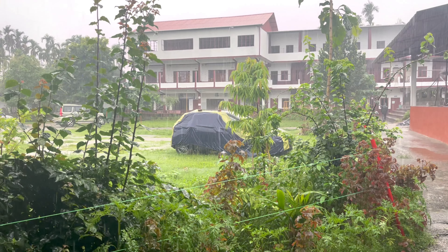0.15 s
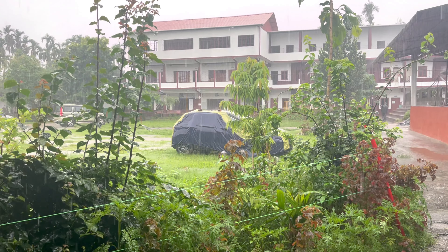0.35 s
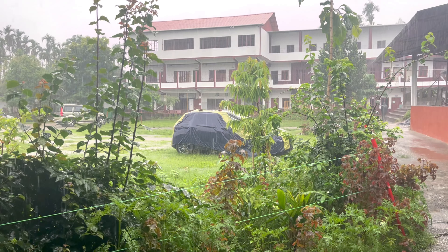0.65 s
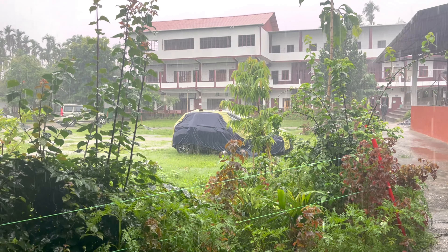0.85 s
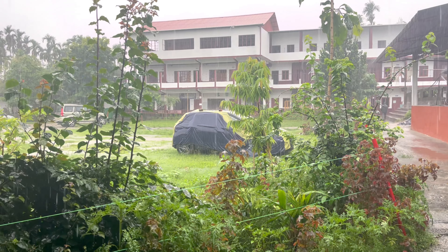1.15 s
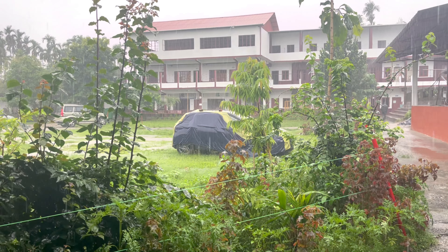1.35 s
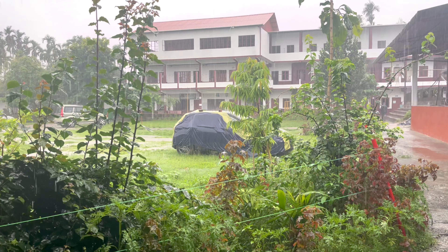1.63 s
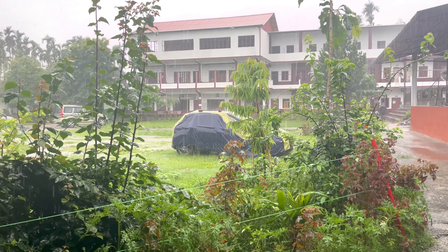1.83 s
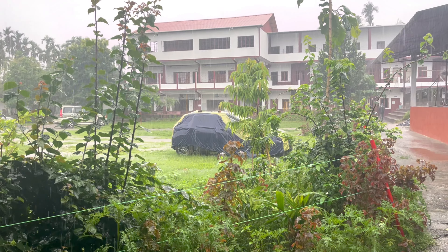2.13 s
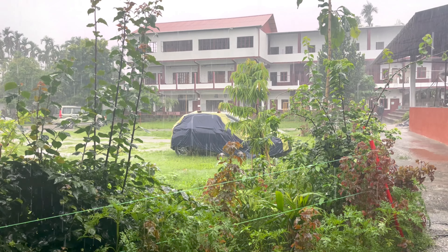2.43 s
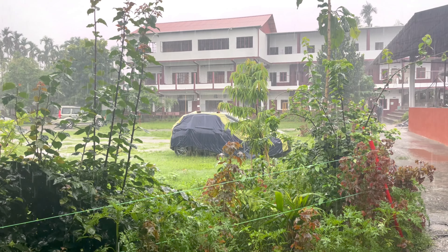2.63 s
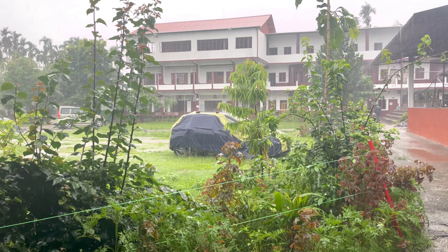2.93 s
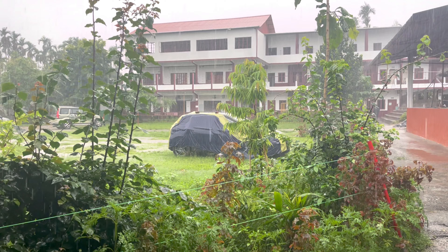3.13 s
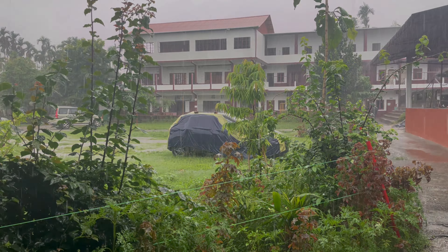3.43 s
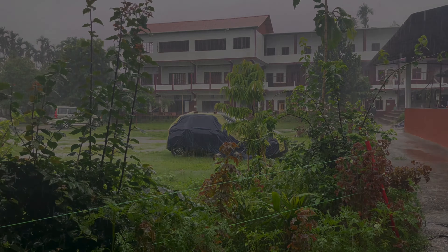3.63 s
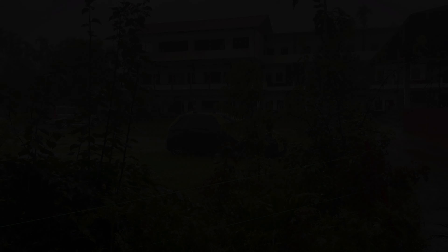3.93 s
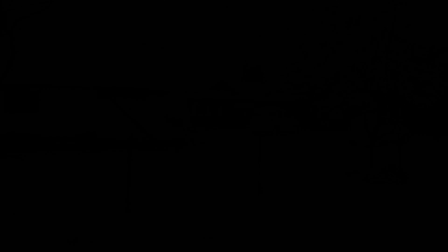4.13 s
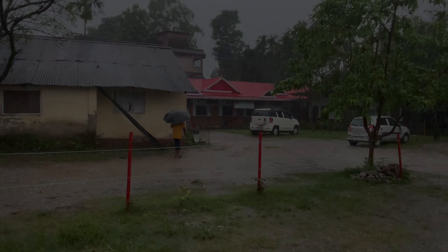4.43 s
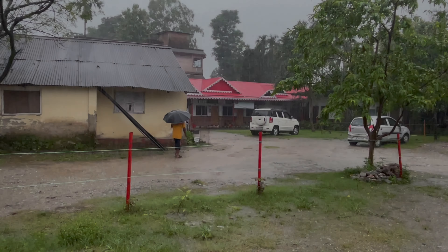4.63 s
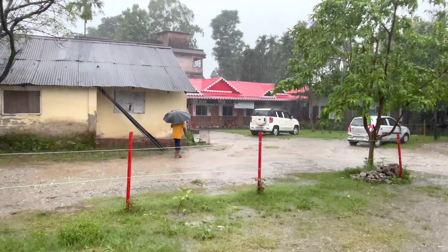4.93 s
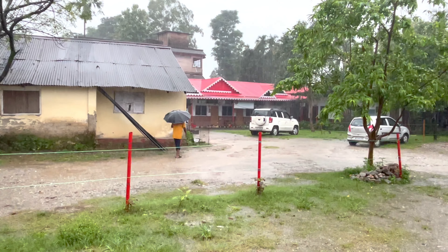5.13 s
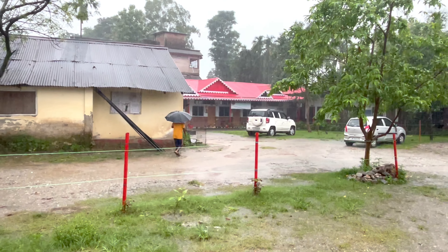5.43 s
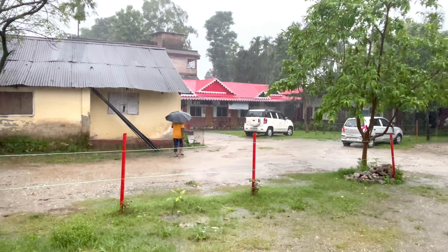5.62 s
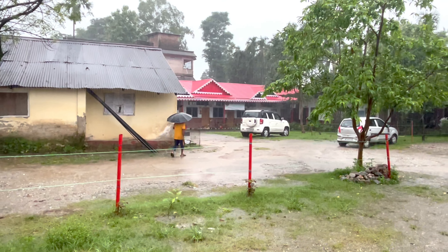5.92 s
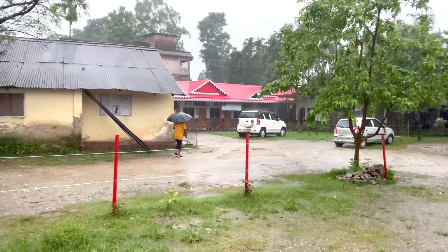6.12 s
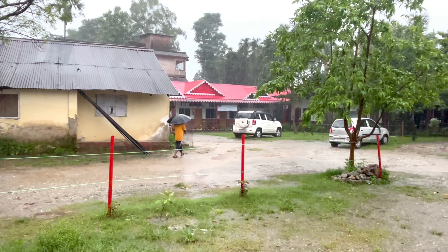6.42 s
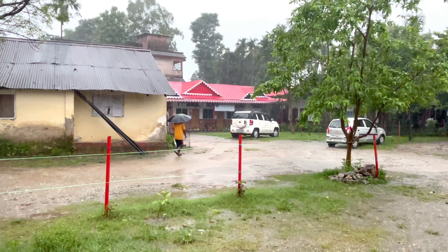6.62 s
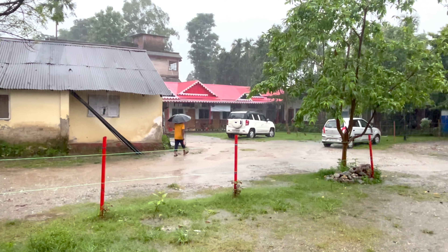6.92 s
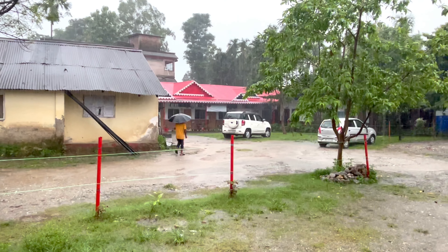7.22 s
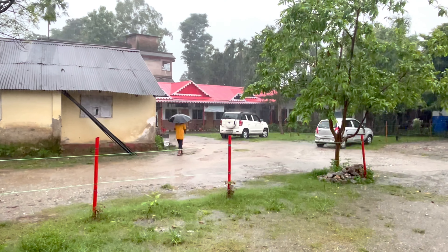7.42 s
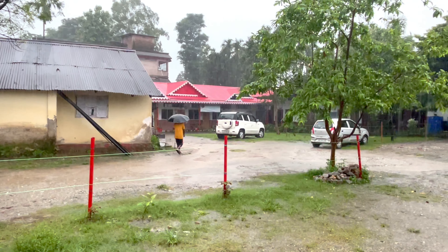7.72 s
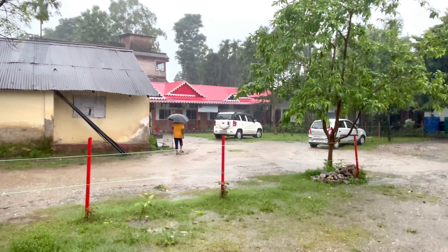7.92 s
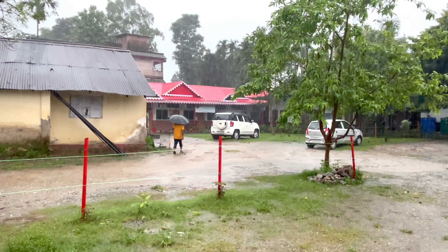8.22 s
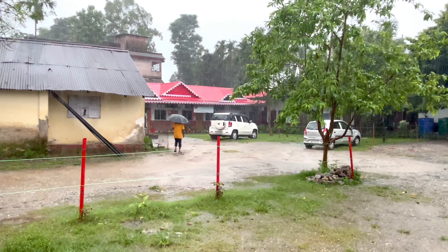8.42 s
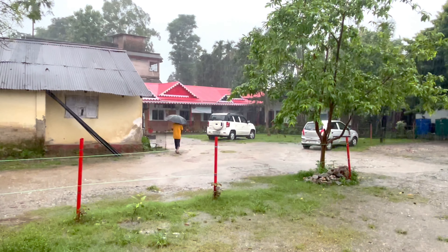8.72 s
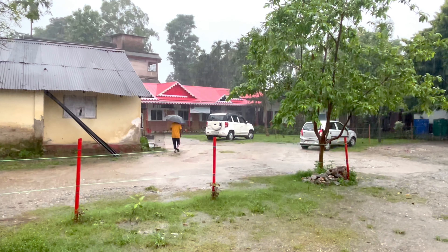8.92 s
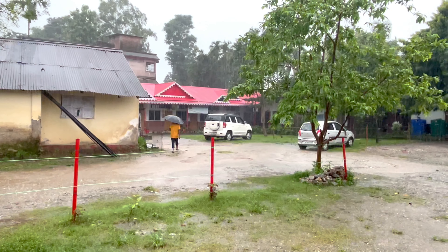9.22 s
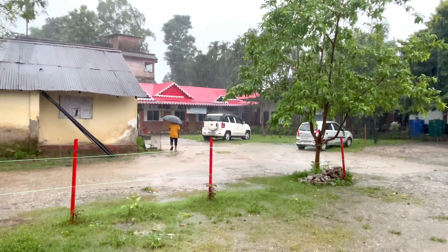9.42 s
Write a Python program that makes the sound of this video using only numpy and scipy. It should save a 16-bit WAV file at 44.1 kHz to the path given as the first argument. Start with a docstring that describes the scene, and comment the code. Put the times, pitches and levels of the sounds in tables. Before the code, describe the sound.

Steady downpour on foliage, low roar beneath, dwindles to silence; a hard cut brings darker yard rain with scattered drop knocks and soft booms.

```python
"""A leafy garden, then, after a hard cut, a gravel yard near a sheet roof: heavy rain in both,
heard by a small two-port microphone. The garden rain fades out before the cut.
Countless far drops blend into a wash of filtered noise, over a low roar and gusts of wind rumble.
Short dying oscillations make the sharp high ticks in both scenes, and the low-to-middle knocks
and short low booms in the yard."""
import sys
import numpy as np
from scipy import signal
from scipy.fft import rfft, irfft, next_fast_len
from scipy.io import wavfile
from scipy.ndimage import uniform_filter1d

SR = 44100
rng = np.random.default_rng(int(sys.argv[2]) if len(sys.argv) > 2 else 0)


def bounce(signal):
    """Save signal as a 16-bit WAV file at the path given by the first command-line argument."""
    frames = np.transpose(np.atleast_2d(signal))
    limited = np.clip(frames, -1, 1)
    pcm = np.round(limited * 32767).astype(np.int16)
    wavfile.write(sys.argv[1], SR, pcm)


N = 421584  # length in samples
CUT_S = 5.123  # the garden gives way to the yard
TICK_SPRAY_DB, KNOCK_SPRAY_DB = -31, -36  # starting level of the noise spray after each splat


def gain_of(db):
    """Decibel law: 20 dB is a factor of ten in amplitude."""
    return 10 ** (np.asarray(db) / 20)


def evened(x):
    """Power normalisation: scale to a root mean square of 1."""
    return x / np.sqrt(np.mean(x ** 2) + 1e-20)


def read(table, at, warp=np.asarray):
    """Linear interpolation of every column of a table, on a plain or warped axis."""
    axis, *columns = np.transpose(table)
    return [np.interp(warp(at), warp(axis), column) for column in columns]


def add(mix, s, sound):
    """Superposition: sum a sound into the mix from a given second, cut off at the end."""
    part = mix[:, round(s * SR):][:, :sound.shape[1]]
    part += sound[:, :part.shape[1]]


def under(hz, x):
    """Low-pass filtering without phase shift: keep what lies below a pitch."""
    return signal.sosfiltfilt(signal.butter(3, hz, fs=SR, output="sos"), x)


def splat(hz, cycles, spray_db):
    """Damped oscillation: a few dying cycles of random phase, then the noise spray of fragments."""
    u = np.arange(int(5 * cycles * SR / hz)) * hz / (SR * cycles)
    envelope = np.e * 2 * u * np.exp(-2 * u)  # peaks at 1
    blow = envelope * np.sin(2 * np.pi * (cycles * u + rng.random()))
    t = np.arange(800) / SR
    fragments = gain_of(spray_db - 60 * t / .03)  # falls at 60 dB per 30 ms
    fragments = fragments * rng.standard_normal(800)
    return np.convolve(blow, fragments + (t == 0))


def far_drops(patchy_db, flicker_db):
    """Central limit of countless impacts: two independent white noises, drifting in level."""
    a, b, c, d, patches = rng.standard_normal((N // 128 + 5, 257, 5)).T  # each is pitch by time
    patches = uniform_filter1d(patches, size=10, axis=0)
    patches = evened(uniform_filter1d(patches, size=14, axis=1))
    flicker = evened(uniform_filter1d(a[0], size=14))  # sheets of rain, all pitches at once
    drift = gain_of(patchy_db * patches + flicker_db * flicker)
    spectra = np.array([a + 1j * b, c + 1j * d]) * drift
    return evened(signal.istft(spectra, nperseg=512, noverlap=384)[1][:, :N])


def near_drops(per_s, spread_db, low_hz, high_hz, cycles, spray_db, count=9):
    """Clustered shot noise: random splats of many pitches; most are small, a few are large."""
    # near drops come in bunches, shaken from leaves and eaves
    bunches = evened(uniform_filter1d(rng.standard_normal(N), size=round(.04 * SR)))
    bunches = gain_of(5 * bunches)
    size = gain_of(spread_db * np.minimum(rng.exponential(1, (2, N)), 3.2))
    size = size * (rng.random((2, N)) < per_s / SR * bunches / bunches.mean())
    kind = rng.integers(0, count, (2, N))
    out = np.zeros((2, N))
    for k, hz in enumerate(np.geomspace(low_hz, high_hz, count)):
        # long low splats are no stronger per Hz than short high ones
        shape = splat(hz, cycles, spray_db) * hz / high_hz
        out += signal.oaconvolve(size * (kind == k), shape[None], axes=1)[:, :N]
    return evened(out)


def at_ports(pair, colour, stereo):
    """Stereo decorrelation: the right carries the left's sound phase-shifted, mixed with another."""
    size = next_fast_len(N)
    hz = np.fft.rfftfreq(size, 1 / SR)
    gains = gain_of(read(colour, hz, np.log1p))
    gains = gains * np.minimum(hz / colour[0][0], 1) ** 2  # falls away below the first row
    same, lead = read(stereo, hz, np.log1p)
    first, second = rfft(pair, size)
    right = same * np.exp(1j * lead) * first + np.sqrt(1 - same ** 2) * second
    return irfft(np.array([first, right]) * evened(gains), size)[:, :N]


# Gusts of wind rumble. Each row: time in seconds, extra level in dB.
WIND_GUSTS = [(0, 0), (0.7, -3), (1.4, 0), (2.6, 1), (2.95, 9), (3.3, 2), (5.1, 2), (5.15, -8), (5.6, -11),
              (6.3, -5), (6.75, 1), (7.05, -2), (7.7, 5), (8.3, -1), (8.5, 5), (8.7, -2), (9.0, 6),
              (9.25, -1), (9.56, -1)]
# Swell of the low roar. Each row: time in seconds, extra level in dB.
ROAR_SWELL = [(0, 3), (1.2, 3), (3.4, 4), (5.1, 5), (5.15, -3), (6.2, 2), (6.7, 0), (7.1, -2.5), (7.35, 0),
              (7.65, 2), (8.0, -2), (8.4, 1), (8.8, -1), (9.1, 0), (9.56, -1.5)]


def downpour(strength, colour, stereo, patchy_db, flicker_db, ticks_db, taps_db):
    """Superposed sources through one tone colour: wash, ticking and tapping, with swelling low bands."""
    pair = far_drops(patchy_db, flicker_db)
    pair = pair + gain_of(ticks_db) * near_drops(380, 4.3, 2400, 11800, 1.25, TICK_SPRAY_DB)
    pair = pair + gain_of(taps_db) * near_drops(150, 2.8, 286.0, 2410, 2.56, KNOCK_SPRAY_DB)
    heard = at_ports(pair, colour, stereo)

    t = np.arange(N) / SR
    start, steady_db, under_db, settle_s = strength
    level = gain_of(steady_db - under_db * np.exp(-np.maximum(t - start, 0) / settle_s))

    low, rumble = under(180, heard), under(65, heard)
    upper, roar = heard - low, low - rumble
    roar = gain_of(read(ROAR_SWELL, t)[0]) * roar
    rumble = gain_of(read(WIND_GUSTS, t)[0]) * rumble
    return level * (upper + roar + rumble)


# Tone colour of the whole garden sound, left and right.
# Each row: frequency in Hz, then left and right relative levels in dB per Hz.
GARDEN_COLOUR = [(25, -29.8, -30.3), (50, -7.6, -8.4), (75, -6.5, -7), (100, -7.5, -8), (125, -4.6, -5.2),
                 (195, -4.4, -4.6), (285, .8, .8), (335, -.8, -.2), (395, .6, 1), (455, -2.8, -2),
                 (500, -2, -1.4), (680, -5.4, -2.9), (1250, -2, .2), (1610, -3.4, -.6), (1780, -7.4, -10.6),
                 (2100, -9, -10.2), (2800, -11.7, -11.2), (3500, -11.2, -12.6), (4200, -11.2, -15.2),
                 (5200, -15.8, -18), (6300, -18.8, -19), (10800, -21.7, -21.1), (12900, -26, -25.8),
                 (14200, -24.8, -24.8), (14700, -25.6, -25.6), (15700, -31, -31)]
# Stereo image by frequency: likeness of left and right, and phase lead of the right.
# Each row: frequency in Hz, likeness from 0 to 1, phase lead in radians.
GARDEN_STEREO = [(60, .99, .1), (250, .95, .35), (400, .9, .5), (540, .7, .7), (700, .34, -.44),
                 (1030, .4, -1.8), (1250, .22, 0), (1550, .22, 2.9), (1680, .1, 1.2), (1850, .56, -.2),
                 (2400, .48, -.3), (3100, .28, -1.3), (4300, .5, -.13), (5200, .33, .6), (5800, .42, 1.3),
                 (6600, .5, 1.2), (7300, .62, 2.2), (8400, .99, 3.14), (10000, .73, 4.71), (12000, 1, 6.28),
                 (13700, .61, 7.85), (15300, 1, 9.42)]


def garden_rain():
    """Spectral shaping with the garden's tone colour, and a fade linear in amplitude up to the cut."""
    strength = (1.5, -23.5, 1, 1)  # settles from s, steady dB, dB under it at first, settling time s
    rain = downpour(strength, GARDEN_COLOUR, GARDEN_STEREO,
                    patchy_db=1, flicker_db=.6, ticks_db=-11.5, taps_db=-18.5)
    t = np.arange(N) / SR
    fade_from_s, fade_to_s = 3.12, 5.124
    fade = np.clip((fade_to_s - t) / (fade_to_s - fade_from_s), 0, 1)
    return fade * (t < CUT_S) * rain


def filling_in(rain):
    """Band subtraction: the patter of the middle pitches starts thin after the cut and fills in."""
    band = signal.butter(1, (700, 1500), "bandpass", fs=SR, output="sos")
    patter = signal.sosfilt(band, rain)
    since = np.maximum(np.arange(N) / SR - CUT_S, 0)
    missing, fill_s = .38, .6  # share taken out at the cut, time constant in seconds
    return rain - missing * np.exp(-since / fill_s) * patter


# Tone colour of the whole yard sound, left and right.
# Each row: frequency in Hz, then left and right relative levels in dB per Hz.
YARD_COLOUR = [(25, -26, -27), (50, -7.6, -8.6), (80, -3.6, -4.1), (100, -4, -4.5), (120, -.5, -1.1),
               (190, -5.2, -5.3), (250, -3.2, -2.8), (320, -4.8, -4), (400, -4.2, -2.9), (455, -6, -4.4),
               (750, -11.6, -6.4), (1150, -6.2, -5.8), (1500, -8.5, -7), (1650, -9.5, -7.5),
               (1850, -15.5, -11.5), (2600, -20, -15.5), (3500, -19, -18.2), (4200, -19.3, -21),
               (5000, -23.3, -23.6), (6200, -27.8, -25), (8300, -31.7, -30.9), (10800, -32.6, -31.7),
               (12900, -36.2, -36.2), (14200, -34.6, -34.6), (14700, -35.8, -35.8), (15700, -42, -42)]
# Stereo image by frequency: likeness of left and right, and phase lead of the right.
# Each row: frequency in Hz, likeness from 0 to 1, phase lead in radians.
YARD_STEREO = [(60, .99, .1), (250, .96, .38), (450, .84, .69), (560, .65, .8), (700, .12, -.6),
               (860, .5, -1.6), (1200, .46, -.7), (1500, .17, -2), (1800, .18, -1.8), (2070, .33, .1),
               (2500, .1, -1), (3100, .3, -3.1), (3800, .14, 0), (5200, .15, 3.01), (6500, .5, .7),
               (7100, .2, 2.8), (7900, .8, 3.1), (8500, .9, 3.18), (10000, .6, 4.73), (12000, .99, 6.29),
               (13700, .56, 7.92), (15300, 1, 9.42)]


def yard_rain():
    """Spectral shaping with the yard's tone colour, starting abruptly at the cut."""
    strength = (5, -24, 5, 1.5)  # settles from s, steady dB, dB under it at first, settling time s
    rain = downpour(strength, YARD_COLOUR, YARD_STEREO,
                    patchy_db=1.15, flicker_db=.6, ticks_db=-14, taps_db=-19)
    return (np.arange(N) / SR >= CUT_S) * filling_in(rain)


def single_splats(table, cycles, spray_db, lag_s):
    """Level and arrival-time differences: each listed splat reaches the left port lag_s later."""
    out = np.zeros((2, N))
    for s, peak_db, hz, pan_db in table:
        sound = gain_of(peak_db) * splat(hz, cycles, spray_db)
        add(out[:1], s + lag_s, gain_of(pan_db / 2) * sound[None])
        add(out[1:], s, gain_of(-pan_db / 2) * sound[None])
    return out


# Short low booms in the yard.
# Each row: start in seconds, nominal peak in dB, pitch in Hz, left minus right in dB.
YARD_BOOMS = [(5.66, -31, 110, .5), (5.89, -32, 120, .5), (6.22, -32, 120, .5), (6.35, -31, 120, .5),
              (6.92, -30, 120, 0), (7.09, -20.5, 128, 0), (7.47, -28, 105, .5), (7.63, -27, 140, 1),
              (7.67, -26, 125, 1), (8.18, -24, 125, .5), (8.37, -28, 115, .5), (8.57, -28, 120, .5),
              (8.72, -26, 123, .5), (8.81, -18, 112, .5), (8.85, -24, 120, 0), (8.985, -22.5, 118, -1),
              (9.245, -29, 120, 0)]


def booms():
    """Low damped oscillation: a few cycles with hardly any spray."""
    return single_splats(YARD_BOOMS, 2.7, -60, 0.00017)


# Short low-to-middle knocks scattered through the rain.
# Each row: start in seconds, nominal peak in dB, pitch in Hz, left minus right in dB.
KNOCKS = [(5.354, -21, 700, -6), (5.858, -17.5, 1150, -1), (5.952, -17, 800, -6), (6.04, -21, 750, -5),
          (6.173, -20, 600, -4), (6.219, -20, 1000, -5), (6.424, -21, 650, -8), (6.442, -19.5, 900, -6),
          (7.282, -17, 950, -3), (7.311, -18, 1250, -4), (7.776, -20, 1410, -3), (7.807, -19, 750, -4),
          (7.817, -15.5, 880, -6), (7.819, -19, 360, -1), (7.832, -18.5, 780, -6), (7.852, -18, 700, -4),
          (8.211, -15.5, 950, -5), (8.471, -18, 945, -4), (8.536, -19.5, 550, -2), (8.689, -19, 1250, -2.5),
          (8.856, -16, 600, -4), (9.029, -18, 1260, -3), (9.082, -18, 1300, -2), (9.164, -17, 520, -1),
          (9.234, -15.5, 1200, -8)]


def knocks():
    """Heavy damping: each knock dies within a few cycles of its pitch."""
    return single_splats(KNOCKS, 1.3, KNOCK_SPRAY_DB, 0.00025)


# Single sharp high ticks in both scenes.
# Each row: start in seconds, nominal peak in dB, pitch in Hz, left minus right in dB,
# nominal peak in dB of the thin snap on top.
SHARP_TICKS = [(0.156, -21, 4500, 5, -40), (0.4583, -28, 7500, 1, -24), (0.5275, -19, 5000, 7, -14),
               (0.7088, -15, 4200, 7, -29), (0.7493, -22, 5000, 9, -40), (0.8985, -21, 4800, 8, -29),
               (1.3202, -17, 5400, 7.9, -34), (1.7485, -18, 5600, 5, -34), (1.9286, -17, 4800, 7.2, -30),
               (2.182, -21, 4500, 6, -40), (2.2555, -14, 6600, 7, -20), (2.413, -24, 6500, 4, -30),
               (2.5935, -15, 4400, 7, -24), (2.9079, -17, 6500, 3, -24), (3.0319, -22, 6800, 4, -25),
               (3.256, -22, 5000, 5, -40), (3.3864, -40, 7000, .3, -16.5), (3.411, -16, 6200, 5, -24),
               (4.5387, -21, 4800, 9, -33), (5.2585, -45, 7000, .3, -29), (5.8027, -28, 6220, -9.6, -45),
               (5.9994, -26, 4500, 3, -27), (6.9391, -28, 7210, 12, -45), (7.7605, -27, 7000, 10, -45),
               (7.824, -32, 6500, 5, -16.5), (7.8813, -40, 7000, -2, -26), (8.5392, -26, 6870, -8.9, -45),
               (9.2478, -40, 7000, 0, -25)]


def ticks():
    """Two-part impulse: a splat with its own left-right balance and a thin snap equal at both ports."""
    # these ring a little longer and splash more than the random ticking in the downpour
    splats = single_splats([row[:4] for row in SHARP_TICKS], 1.4, -28, .00005)
    snap_hz = 10800
    snaps = [(s, snap_db, snap_hz, 0) for s, *_, snap_db in SHARP_TICKS]
    return splats + single_splats(snaps, 1, TICK_SPRAY_DB, .00008)


def scene():
    """Superposition: the garden rain, the yard rain and the single sounds add up."""
    rain = garden_rain() + yard_rain()
    return rain + booms() + knocks() + ticks()


def record(dry):
    """Band limiting: a linear-phase low-pass filter removes what lies above 15.8 kHz."""
    low_pass = signal.firwin(511, 15800, window=("kaiser", 9), fs=SR)
    return signal.oaconvolve(dry, low_pass[None], "same")


dry = scene()
out = record(dry)
bounce(out)
```